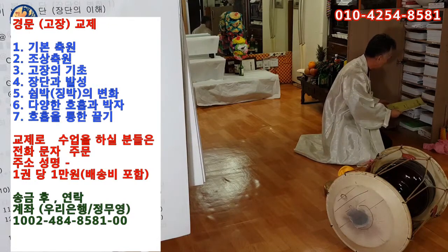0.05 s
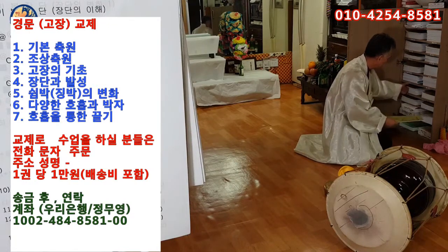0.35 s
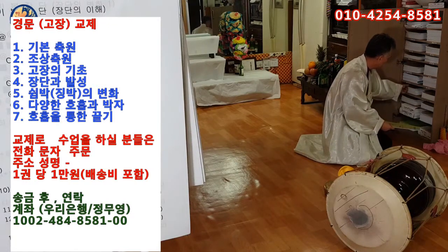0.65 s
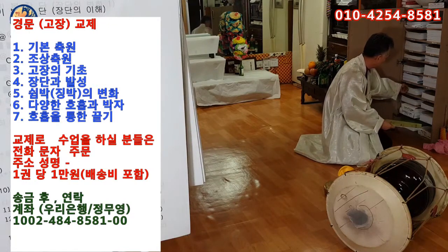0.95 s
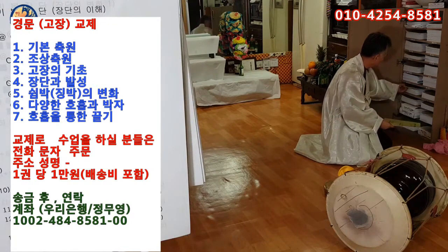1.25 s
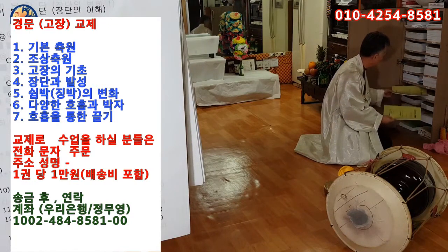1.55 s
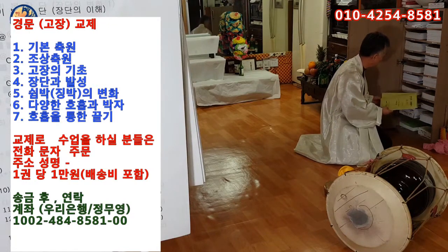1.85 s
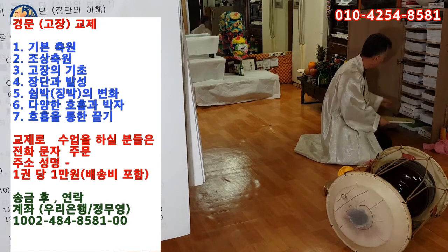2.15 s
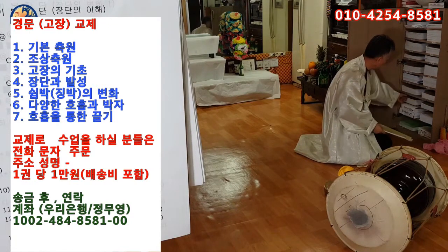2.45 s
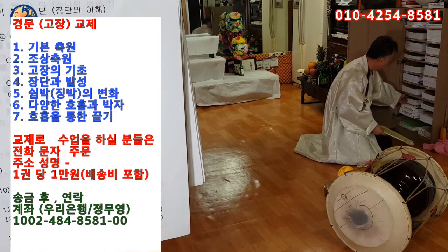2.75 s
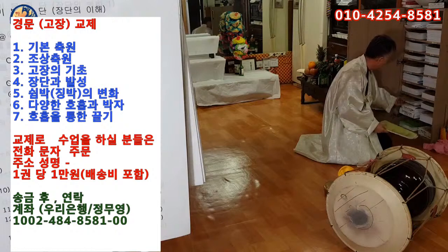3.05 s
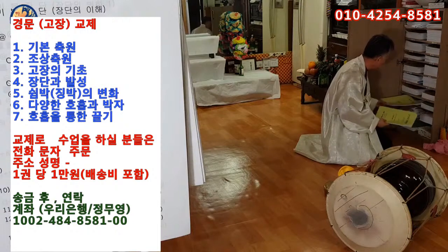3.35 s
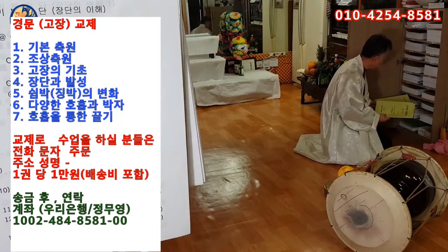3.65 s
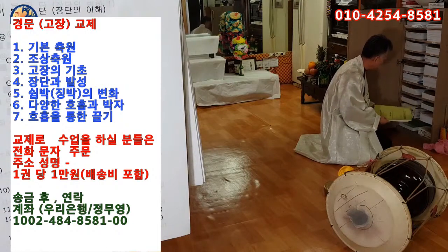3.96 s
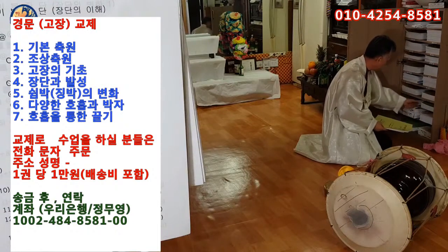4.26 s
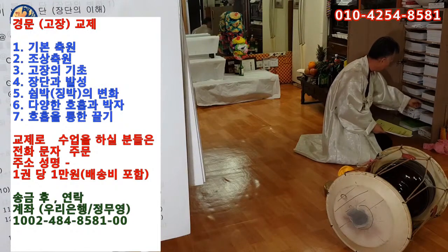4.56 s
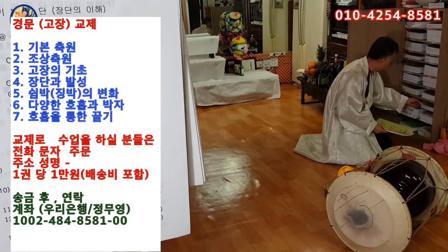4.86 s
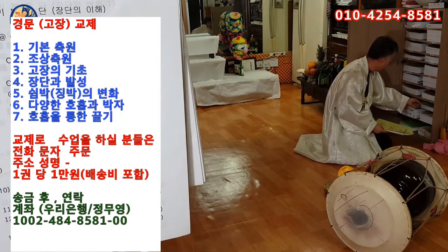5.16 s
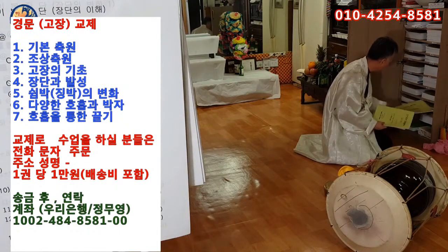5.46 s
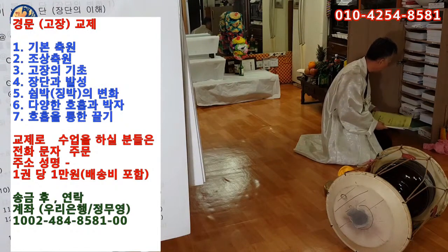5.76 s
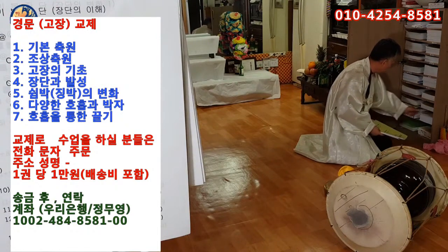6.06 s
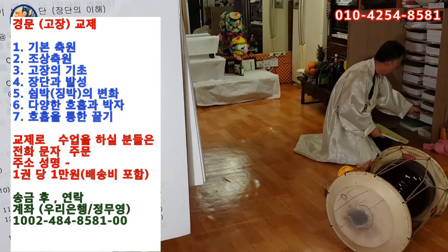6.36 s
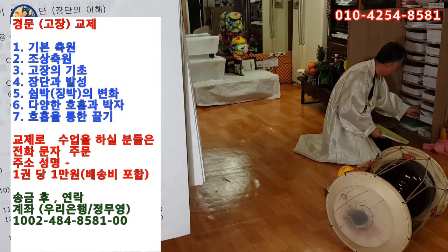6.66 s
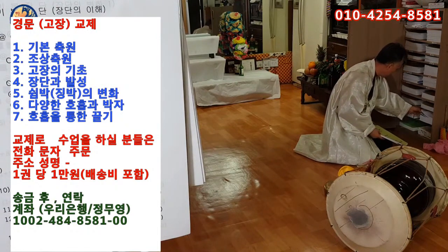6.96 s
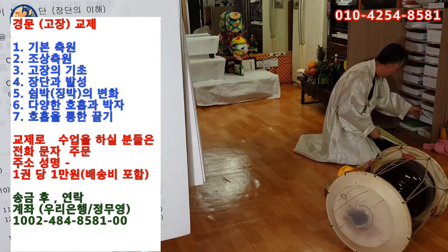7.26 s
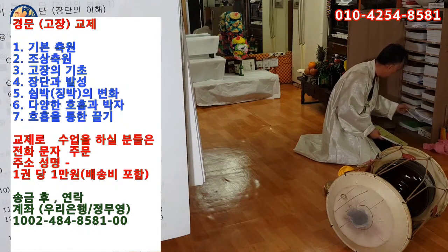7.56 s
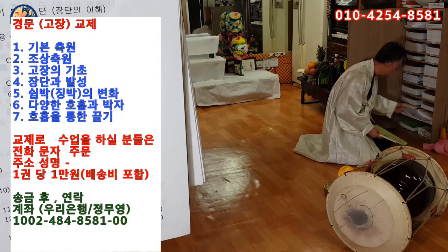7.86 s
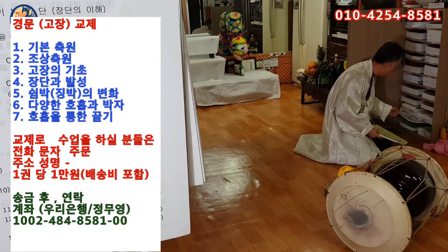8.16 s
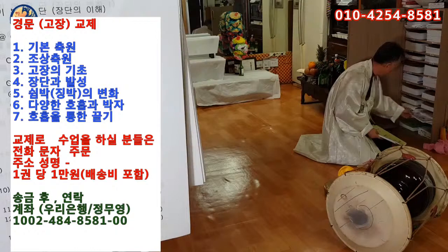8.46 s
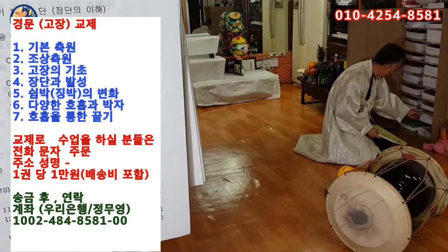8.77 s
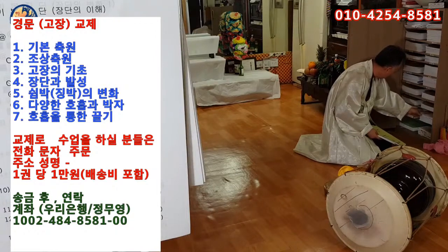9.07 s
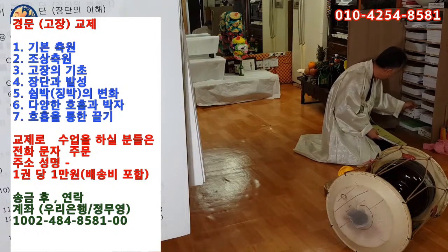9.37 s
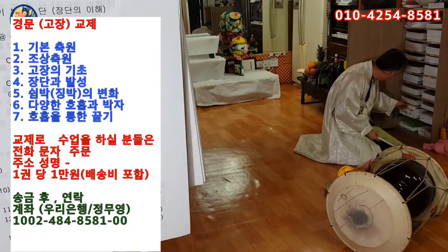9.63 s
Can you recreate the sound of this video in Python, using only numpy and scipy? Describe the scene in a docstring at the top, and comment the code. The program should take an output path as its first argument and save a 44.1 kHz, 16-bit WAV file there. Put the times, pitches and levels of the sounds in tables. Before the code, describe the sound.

A small, quiet room with a faint low rumble and thin hiss; everything is heard from a few metres away. Thin paper booklets are handled at a wooden shelf. A soft bump comes at 0.5 seconds and a firmer double knock at 1.3. A short papery scrape follows at 2 seconds, then faint rubs and a satin sleeve swishing. Just before 4 seconds a booklet slaps sharply onto a pile. Dull knocks fall at 4.5 and 5.2, and paper slides briefly between 5.5 and 5.8. Light, irregular knocks and rubs continue from 6.3 to 8, with a sharper knock at 7 and faint sleeve brushing. Around 8.4 to 8.7 seconds a stack drops in a quick cluster of heavy thumps, the loudest moment, making the boards boom briefly. Two lighter knocks follow just after 9 seconds, leaving only the quiet room.

```python
"""Thin paper booklets knock on a wooden shelf as someone kneeling there slides them out and pats them
onto a pile; near the end a stack drops with a heavy thump. Each impact excites the modes of the boards,
squeezes air from between the covers and flicks the paper edges. Sliding friction makes the covers rub
and a satin sleeve swish. All is heard from a few metres off in a small, quiet room."""
import sys
import numpy as np
from scipy import signal
from scipy.fft import rfft, irfft, next_fast_len
from scipy.io import wavfile
from scipy.ndimage import map_coordinates

SR = 44100
rng = np.random.default_rng(int(sys.argv[2]) if len(sys.argv) > 2 else 0)


def wav_out(sig):
    """Save sig, one row per channel (or a flat mono array), as 16-bit PCM at SR to the path in sys.argv[1]."""
    wavfile.write(sys.argv[1], SR, np.round(np.clip(np.atleast_2d(sig).T, -1, 1) * 32767).astype(np.int16))


N = 432180

RISE_SHARE = .14  # rise time over settling time: a floppy book that settles slowly also lands softly
COVER_HZ = 944
TICK_DB, TICK_AT_EDGE_DB = -64, -61  # the tick's reference level, and the edge level it belongs to
TICK_DB_PER_EDGE_DB, TICK_DULLS_DB_PER_S = .55, 110  # growth with edge level, loss with settling time
# Knocks on wood, plus two soft low rubs of shifting (2.69 s) and brushing (8.37 s).
# Each row: start in seconds, knock level in dB, knock pitch in Hz, then shelf thud, cover clap and
# paper edge in dB relative to the knock, and nominal settling time in seconds.
WOOD_CONTACTS = [(0.472, -61.5, 323, 10.5, -8.5, -4.5, 0.02), (1.135, -68.5, 300, 16, -8, -17, 0.016),
                 (1.335, -40, 510, 1, -10, -16, 0.024), (1.354, -43.5, 430, 3.5, -6.5, -12.5, 0.03),
                 (2.69, -70.5, 292, 16, -24, -28, 0.16), (2.863, -60.5, 313, 6.5, -22, -34.5, 0.051),
                 (4.529, -44.5, 482, 7.5, -8.5, -39, .016), (5.225, -50.5, 393, 8, -11, -24.5, .018),
                 (5.788, -52, 560, 4, -14.5, -2, 0.0043), (6.337, -53, 350, 4.5, -10.5, -18.5, 0.018),
                 (6.527, -51.5, 515, 4.5, -4.5, -24, 0.044), (6.587, -44, 510, -17, -5.5, -32, 0.0096),
                 (7.031, -34, 403, -14, -9.5, -19.5, .012), (7.417, -46.5, 394, -2.5, -5, -10, 0.031),
                 (7.857, -50.5, 284, 5, -4, -14.5, .023), (7.963, -56.5, 292, 3, -4, -8.5, 0.037),
                 (8.37, -59.5, 300, -6, -23, -11.5, 0.11), (8.433, -43.5, 366, 11.5, -7, -29, .055),
                 (8.561, -33, 535, 9.5, -6.5, -8, 0.014), (8.586, -28.5, 467, 7, -5, -15.5, 0.0074),
                 (8.669, -32, 510, -13, -4, -16.5, .015), (8.797, -54.5, 389, 0, -11, -28, 0.0099),
                 (8.834, -51, 467, 1.5, -8, -36, .018), (9.11, -46.5, 480, 7, -0.5, -23, 0.0277),
                 (9.168, -45.5, 426, -1.5, -2.5, -10, .031)]
def knocks():
    """Impact excitation: the harder and shorter a contact with the wood, the more it ticks."""
    out = np.zeros(N)
    for start, db, knock_hz, _, clap_db, edge_db, settle in WOOD_CONTACTS:
        tick_db = TICK_DB + TICK_DB_PER_EDGE_DB * (db + edge_db - TICK_AT_EDGE_DB)
        tick_db -= TICK_DULLS_DB_PER_S * settle
        rise = RISE_SHARE * settle
        add(out, start, impact(rise, settle, db, knock_hz, db + clap_db, COVER_HZ, db + edge_db, tick_db))
    return out


# Modes of the board a book lands on. Each row: frequency in Hz, bandwidth in Hz, level in dB.
BOARD_MODES = [(251.6, 68, 0), (343, 79, -2.5), (401, 60, -1.5), (460, 42, -3.5), (500, 52, -2),
               (587, 40, -2), (609, 42, -2), (752, 43, -5.5)]
# Resonances of the air squeezed from between two covers. Each row: frequency and bandwidth as
# multiples of the clap pitch, level in dB.
AIR_POCKET_MODES = [(.87, .17, -2.5), (1.099, .22, -6.5), (1.361, 0.2, -11)]
# Spectrum of flicked paper edges. Each row: frequency in Hz, relative spectral density in dB.
EDGE_SPECTRUM = [(300, -48.5), (900, -13), (1400, 1), (2000, 0.5), (2800, -6.5), (4000, -10.5),
                 (6000, -25.5), (9000, -39), (16000, -42.5)]
# Spectrum of paper's crisp tick and hiss. Each row: frequency in Hz, relative spectral density in dB.
CRISP_SPECTRUM = [(1500, -38.5), (3500, 0.5), (5000, -2), (7300, -2), (9000, -8), (12000, -6.5),
                  (16000, -3)]
def impact(rise, settle, knock_db, knock_hz, clap_db, clap_hz, edge_db, tick_db):
    """Source and filter: contact forces drive the board, the air between the covers and the paper edges."""
    pocket = [(ratio * clap_hz, width * clap_hz, db) for ratio, width, db in AIR_POCKET_MODES]
    board_force = contact_force(rise, 0.62 * settle, t60=0.1, hardness=0.33, depth_db=0.5)
    clap_force = contact_force(rise, 0.64 * settle, t60=0.11, hardness=0.31, depth_db=0.0)
    edge_force = contact_force(rise, 0.66 * settle, t60=0.12, hardness=.18, depth_db=6.0)
    tick_force = contact_force(rise, 0.36 * settle, t60=0.25, hardness=0.087, depth_db=5.5)
    board = amp(knock_db + 1.5) * resonate(board_force, BOARD_MODES, knock_hz, breadth=0.58)
    clap = amp(clap_db) * resonate(clap_force, pocket, clap_hz, breadth=0.91)
    edge = amp(edge_db - 1.0) * colour(edge_force, EDGE_SPECTRUM)
    tick = amp(tick_db - 3.5) * colour(tick_force, CRISP_SPECTRUM)
    return board + clap + edge + tick


def contact_force(rise, settle, t60, hardness, depth_db):
    """Impulse plus decaying noise: one clean strike, then the leaves flutter down one after another."""
    t, rise = np.arange(SR // 3) / SR, max(rise, 1e-4)
    envelope = (1 - np.exp(-2 * t / rise)) * amp(-60 * np.maximum(t - settle, 0) / t60)
    flutter = envelope * friction_noise(400, depth_db, size=len(t))
    # the quicker the contact, the more of its energy goes into the strike
    strike_share = np.clip(hardness / (1 + rise / 0.0015), 0, 1)
    force = np.sqrt(1 - strike_share) * flutter / np.linalg.norm(flutter)
    force[round(rise * SR / 2)] += np.sqrt(strike_share)
    return force * np.linalg.norm(envelope)


# Low modes of the shelf and floor boards. Each row: frequency in Hz, level in dB, t60 in seconds.
SHELF_MODES = [(58.4, -23, 0.1895), (94.2, -3, 0.25), (111, -7, 0.24), (138.4, -1, 0.24), (158, -3, 0.12),
               (189, -13, 0.3), (224.4, -6, 0.25)]
def shelf_thuds():
    """Free vibration: each contact sets damped modes booming, in a slightly different mix at each spot."""
    out, t = np.zeros(N), np.arange(SR // 2) / SR
    spots_db = rng.standard_normal((len(WOOD_CONTACTS), len(SHELF_MODES)))
    for (start, db, _, thud_db, *_, settle), spot_db in zip(WOOD_CONTACTS, spots_db):
        ring = sum((-1) ** k * amp(level + spot_db[k] - 60 * t / t60) * np.sin(2 * np.pi * hz * t)
                   for k, (hz, level, t60) in enumerate(SHELF_MODES))
        onset = 1 - np.exp(-t / max(RISE_SHARE * settle, 1e-4))
        add(out, start, amp(db + thud_db) * ring * onset)
    return out


PAT_RISE_S, PAT_BOARD_DB, PAT_BOARD_HZ = .0004, -9, 603
# Paper landing on paper. Each row: start in seconds, clap level in dB, clap pitch in Hz,
# edge level in dB, tick level in dB, nominal settling time in seconds.
PILE_PATS = [(1.644, -70.5, 1230, -63.5, -75, 0.021), (2.197, -87, 1300, -63, -71, .015),
             (3.388, -76, 1300, -58, -63, .013), (3.913, -47, 1030, -51, -45, .035),
             (3.948, -29.5, 920, -37, -47.5, .016), (5.572, -57.5, 1510, -77, -64.5, .011)]
def pats():
    """Cushioned impact: a quick slap sounds cover and paper, but reaches the wood weakly through the pile."""
    out = np.zeros(N)
    for start, db, clap_hz, edge_db, tick_db, settle in PILE_PATS:
        pat = impact(PAT_RISE_S, settle, db + PAT_BOARD_DB, PAT_BOARD_HZ, db, clap_hz, edge_db, tick_db)
        add(out, start, pat)
    return out


SLIDE_LEAD_S, SLIDE_ATTACK_DB_PER_S, SLIDE_T60_S = .06, 791, 0.15
JUDDER_HZ, JUDDER_DB = 17, 0.5
# Booklet slides, plus a faint, high sleeve swish (2.739 s) and a faint, steady hollow hiss near 800 Hz
# (3.582 s). Each row: time of full strength and length in seconds, fade in dB, levels of resonance,
# rub and hiss in dB, then resonance pitch, resonance bandwidth and rub cutoff in Hz.
SLIDES_AND_HISSES = [(1.063, 0.071, 14.5, -61.5, -79, -95, 790, 249, 1700),
                     (2.032, 0.016, 1.5, -44.5, -41.5, -53.5, 870, 95, 11600),
                     (2.091, 0.015, 2.5, -42.5, -47.5, -60.5, 825, 95, 11600),
                     (2.739, 0.2, 9, -74, -98, -92, 4900, 1800, 5000),
                     (3.332, 0.14, 3, -64.5, -60, -71, 940, 600, 2200),
                     (3.582, 0.65, 4.5, -76.5, -98, -100, 800, 200, 2000),
                     (5.472, 0.095, 4.5, -56.5, -48.5, -66.5, 2300, 720, 4800),
                     (5.573, 0.0066, 10, -63.5, -52.5, -73.5, 4530, 1500, 4800),
                     (5.752, 0.086, 3, -51.5, -58.5, -59, 730, 600, 3640),
                     (6.536, .065, 1, -57, -60.5, -71.5, 1250, 404, 2100),
                     (6.789, 0.026, 3, -72, -82, -90, 895, 500, 2200),
                     (7.36, 0.041, 1, -69, -85, -95, 1210, 300, 2200)]
def slides_and_hisses():
    """Filtered noise: rub, hiss and one resonance, which in a sliding booklet is the gap under its cover."""
    out = np.zeros(N)
    for time, length, fade_db, band_db, rub_db, hiss_db, band_hz, width_hz, top_hz in SLIDES_AND_HISSES:
        envelope = stroke(length, fade_db)
        drive = envelope * friction_noise(150, depth_db=-1, size=len(envelope))
        band = resonate(drive, [(band_hz, width_hz, 0)], band_hz, breadth=1.5)
        rub = paper_rub(envelope, top_hz)
        hiss = colour(envelope * friction_noise(500, depth_db=0.0, size=len(envelope)), CRISP_SPECTRUM)
        sound = amp(band_db - 3.5) * band + amp(rub_db - 5) * rub + amp(hiss_db - 1) * hiss
        add(out, time - SLIDE_LEAD_S, sound)
    return out


# Spectrum of paper rubbing on paper. Each row: frequency in Hz, relative spectral density in dB.
RUB_SPECTRUM = [(150, -28), (400, 0.5), (800, -0.5), (1300, -0.5), (1750, -1), (2150, 2), (2600, -1),
                (3300, -9.5), (4500, -12), (6500, -29), (12000, -25)]
def paper_rub(envelope, top_hz):
    """Resonant low-pass: the sheet resonates just below top_hz and cannot follow the friction above it."""
    rub = colour(envelope * friction_noise(300, depth_db=6.5, size=len(envelope)), RUB_SPECTRUM)
    return filtered(rub, lambda hz: (1 - (hz / top_hz) ** 2 + .85j * hz / top_hz) ** -2)


def stroke(length, fade_db):
    """Amplitude envelope: the level swells, judders as in stick-slip motion, fades, then dies away."""
    t = np.arange(SR) / SR - SLIDE_LEAD_S
    attack_db = SLIDE_ATTACK_DB_PER_S * np.minimum(t, 0)
    judder_db = JUDDER_DB * np.cos(2 * np.pi * JUDDER_HZ * t)
    release_db = 60 * np.maximum(t - length, 0) / SLIDE_T60_S
    return amp(attack_db + judder_db - fade_db * np.clip(t / length, 0, 1) - release_db)


# Spectrum of brushed satin. Each row: frequency in Hz, relative spectral density in dB.
SATIN_SPECTRUM = [(300, -10), (1500, 1.5), (2700, -3), (4400, -1.5), (6000, -5.5), (7500, -1.5),
                  (8800, -10.5), (15000, -11.5)]
# Reaches of the arm. Each row: time of fastest motion in seconds, level in dB, then speeding-up and
# slowing-down times in seconds.
ARM_REACHES = [(2.2, -67.5, .04, 0.05), (2.77, -79, 0.12, 0.33), (3.225, -77.5, 0.044, 0.054),
               (6.57, -77, .04, 0.22), (7.43, -67.5, 0.057, 0.035), (7.56, -71.5, 0.13, 0.11),
               (7.87, -71.5, 0.173, 0.18), (8.51, -65, 0.12, 0.11), (8.68, -63.5, .04, 0.081)]
def sleeve():
    """Friction noise follows speed: satin brushing the shelf swells and ebbs in a bell curve per reach."""
    t = np.arange(N) / SR
    swish = sum(amp(db) * np.exp(-((t - peak) / np.where(t < peak, rise, fall)) ** 2)
                for peak, db, rise, fall in ARM_REACHES)
    return colour(swish * friction_noise(120, depth_db=2.0), SATIN_SPECTRUM)


def room(x, lag_ms, block=SR // 3):
    """Superposition: direct sound, first on the right, plus diffuse reflections."""
    out = filtered(x, lambda hz: np.exp(1j * np.pi * hz * lag_ms / 1000 * np.array([[-1], [1]])))
    # reflections are drawn afresh every third of a second to average out random comb colouring
    for start in range(0, N, block):
        for ear, response in zip(out, reflections(early_db=-2.5, early_t60=0.056, tail_db=-9.5)):
            add(ear, start / SR, signal.fftconvolve(x[start:start + block], response))
    return out


# Reverberation time of the room. Each row: frequency in Hz, t60 in seconds.
ROOM_T60 = [(90, 0.74), (300, 0.25), (900, 0.27), (3000, 0.28), (12000, 0.13)]
# Likeness of the reflections at the two ears. Each row: frequency in Hz, coherence from -1 to 1.
REFLECTION_COHERENCE = [(80, 0.92), (200, 0.9), (450, 0.58), (900, 0.1), (1800, -0.067), (4000, 0)]
# Strength of the reflections. Each row: frequency in Hz, gain in dB.
REFLECTION_GAIN = [(110, -8.5), (300, -0.5), (800, -1.5), (5000, 4)]
def reflections(early_db, early_t60, tail_db):
    """Stereo impulse response: early reflections off nearby surfaces, then the walls' reverberant tail."""
    hz, t, spectra = signal.stft(rng.standard_normal((2, SR // 2)), SR, nperseg=256)
    decay = amp(-60 * t / along(ROOM_T60, hz)[:, None])
    tail = signal.istft(spectra * decay, SR, nperseg=256)[1]
    t = np.arange(tail.shape[1]) / SR
    early = rng.standard_normal(tail.shape) * amp(-60 * t / early_t60) * (t > .001)
    tail = tail * (t > .012)
    response = amp(early_db) * early / np.linalg.norm(early[0])
    response += amp(tail_db) * tail / np.linalg.norm(tail[0])
    return filtered(spread(response, REFLECTION_COHERENCE), lambda hz: amp(along(REFLECTION_GAIN, hz)))


ROOM_TONE_DB = -62.5
# Spectrum of the room tone. Each row: frequency in Hz, relative spectral density in dB.
ROOM_TONE_SPECTRUM = [(20, -13), (40, -5.5), (57, -1), (85, -5), (160, -8.5), (250, -19.5), (400, -21.5),
                      (800, -30.5), (1500, -36), (4000, -38), (8500, -40), (13000, -38), (15700, -36.5)]
# Likeness of the room tone at the two ears. Each row: frequency in Hz, coherence from -1 to 1.
ROOM_TONE_COHERENCE = [(30, 0.95), (100, 0.88), (250, 0.87), (600, .35), (1500, 0.033), (12000, 0.0342)]
def room_tone():
    """Stationary noise: low building rumble, alike in both ears, under a thin, incoherent hiss."""
    noise = colour(rng.standard_normal((2, N)), ROOM_TONE_SPECTRUM)
    return amp(ROOM_TONE_DB) * unit(spread(noise, ROOM_TONE_COHERENCE))


def friction_noise(rate, depth_db, size=N):
    """Random amplitude modulation: fibres catch and let go about rate times a second."""
    strengths = rng.standard_normal(int(size * rate / SR) + 4)
    catches = map_coordinates(strengths, [np.arange(size) * rate / SR], order=1)
    return unit(rng.standard_normal(size) * amp(depth_db * catches))


def resonate(x, modes, centre_hz, breadth):
    """Forced vibration: a contact strongest near centre_hz drives the modes; white noise keeps its power."""
    def response(hz):
        gain = resonances(hz, modes) * resonances(hz, [(centre_hz, breadth * centre_hz, 0)])
        return gain / np.sqrt(np.mean(abs(gain) ** 2))
    return filtered(x, response)


def resonances(hz, modes):
    """Modal sum: second-order resonances add with alternating signs."""
    return sum((-1) ** k * amp(db) * 1j * hz * width / (centre ** 2 - hz ** 2 + 1j * hz * width)
               for k, (centre, width, db) in enumerate(modes))


def colour(x, spectrum):
    """Minimum-phase filter: causal shaping to the given spectrum; white noise keeps its power."""
    def response(hz):
        cepstrum = irfft(np.log(unit(amp(along(spectrum, hz)))))
        cepstrum[1:] *= 2
        cepstrum[len(cepstrum) // 2:] = 0
        return np.exp(rfft(cepstrum))
    return filtered(x, response)


def spread(pair, coherence):
    """Mid-side mixing: two unrelated signals become left and right of the given coherence."""
    def weights(hz):
        angle = np.arccos(np.clip(along(coherence, hz), -1, 1)) / 2
        return np.array([np.cos(angle), np.sin(angle)])
    mid, side = filtered(pair, weights)
    return np.array([mid + side, mid - side])


def filtered(x, response):
    """Convolution theorem: filtering multiplies the spectrum by a frequency response."""
    size = x.shape[-1]
    padded = 2 * next_fast_len(size // 2 + SR // 8)
    return irfft(rfft(x, padded) * response(np.fft.rfftfreq(padded, 1 / SR)), padded)[..., :size]


def along(points, hz):
    """Interpolation of (Hz, value) points on a logarithmic frequency axis."""
    frequencies, values = np.transpose(points)
    return np.interp(np.log(hz + 1), np.log(frequencies + 1), values)


def amp(db):
    """Decibels to amplitude ratio."""
    return 10 ** (np.asarray(db) / 20)


def unit(x):
    """Normalisation to rms 1."""
    return x / np.sqrt(np.mean(x ** 2) + 1e-20)


def add(track, start_s, sound):
    """Superposition of a sound on a track."""
    part = track[round(start_s * SR):][:len(sound)]
    part += sound[:len(part)]


def scene():
    """Linear mixing: the handling sounds pass through the room, 1 dB louder on the left, over its tone."""
    handling = knocks() + pats() + shelf_thuds() + slides_and_hisses() + sleeve()
    return room(handling, lag_ms=.18) * amp([[.5], [-.5]]) + room_tone()


BAND_LIMIT_HZ = 15800
def record(dry):
    """Ideal low-pass: nothing passes above the band limit."""
    return filtered(dry, lambda hz: hz < BAND_LIMIT_HZ)


dry = scene()
out = record(dry)
wav_out(out)
```